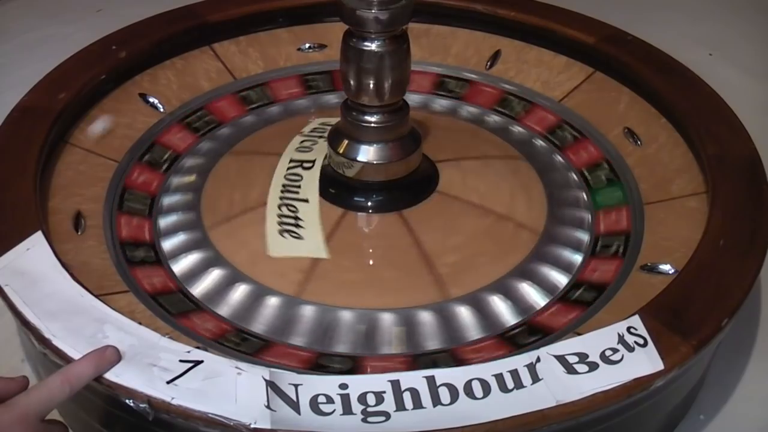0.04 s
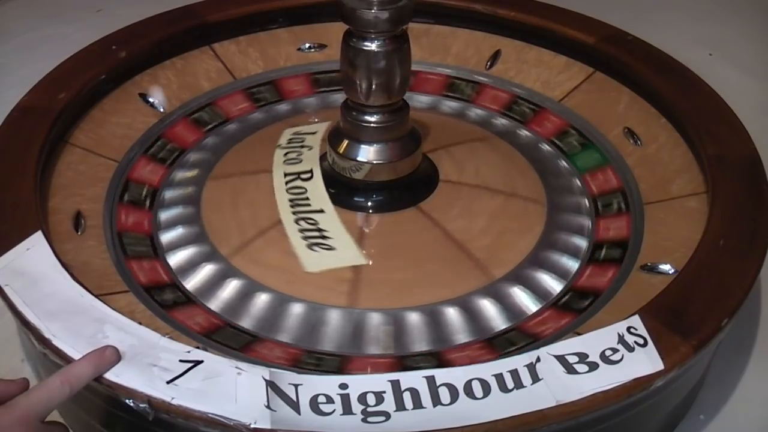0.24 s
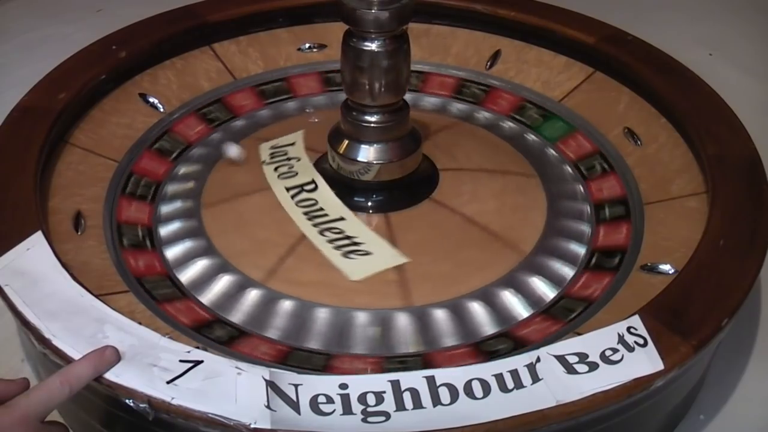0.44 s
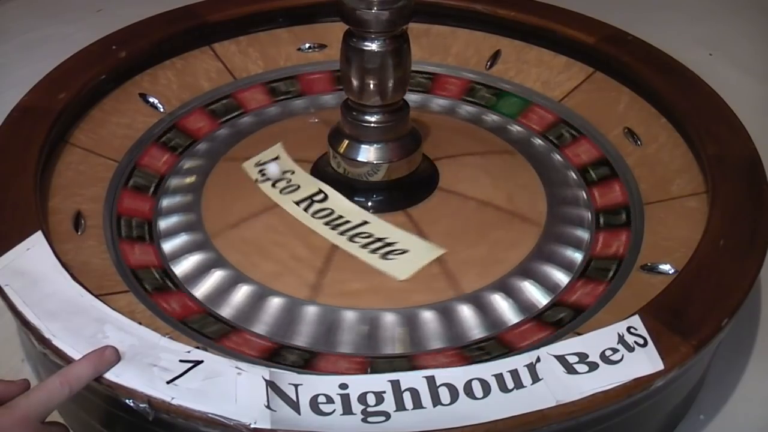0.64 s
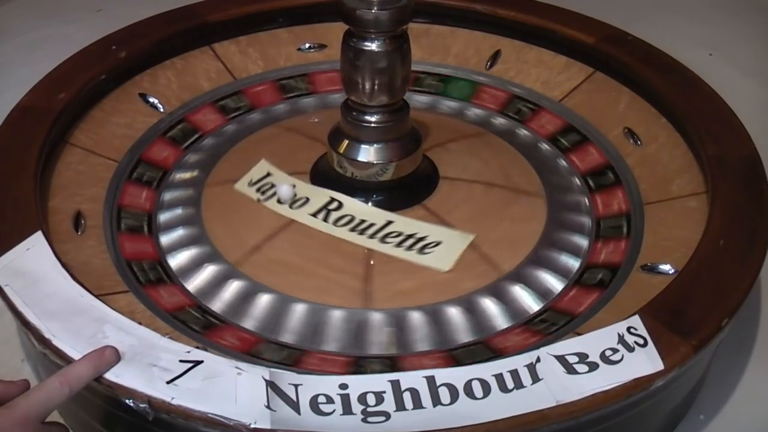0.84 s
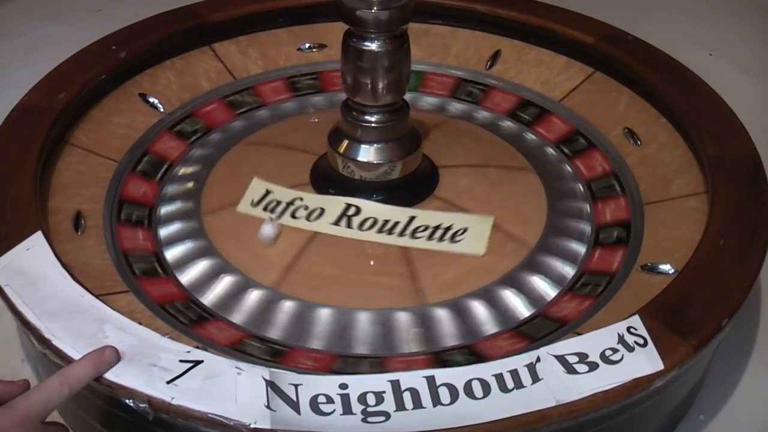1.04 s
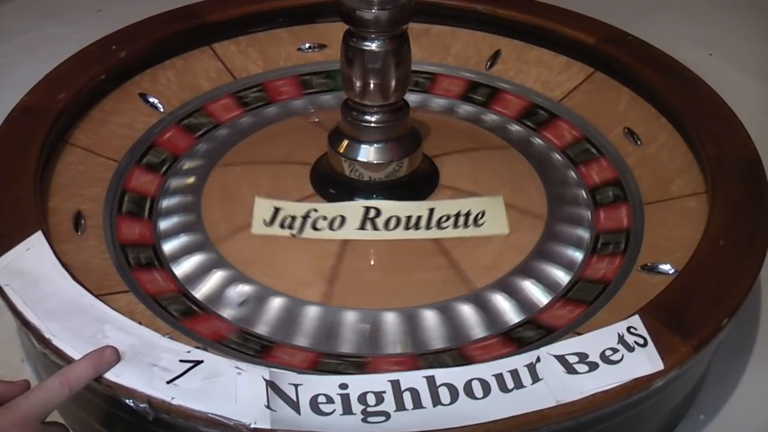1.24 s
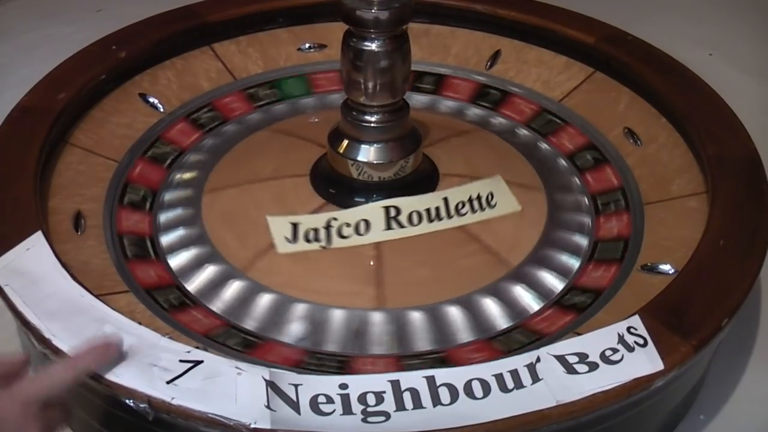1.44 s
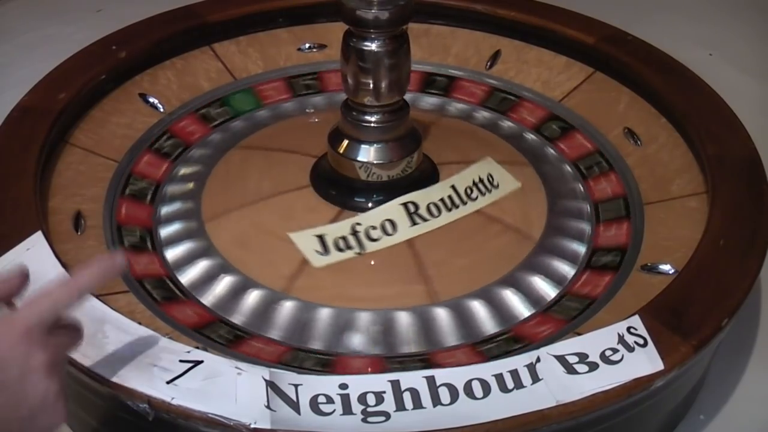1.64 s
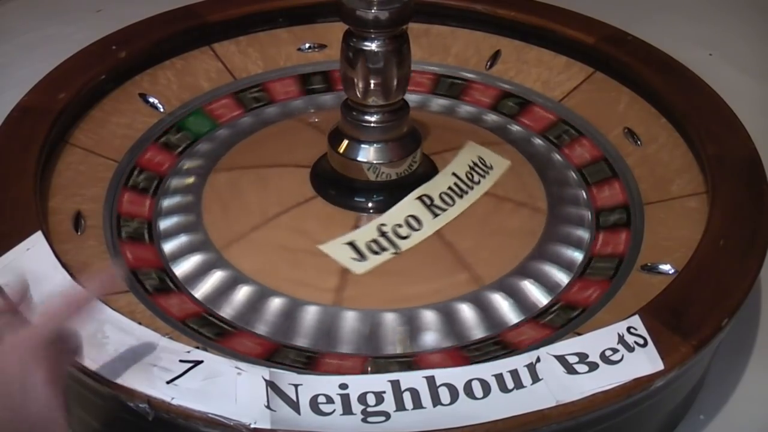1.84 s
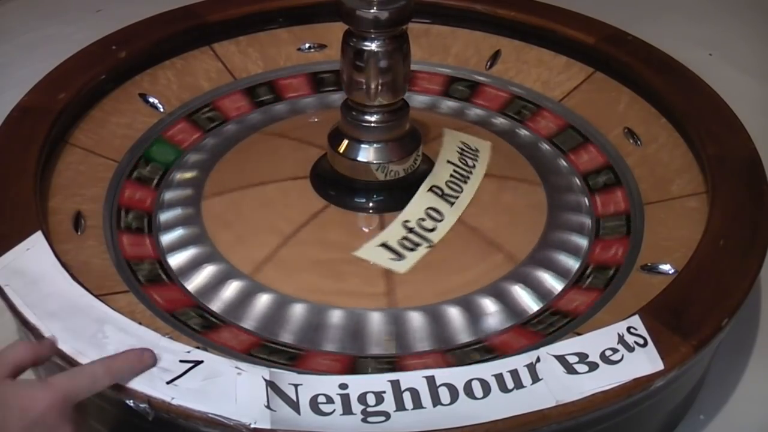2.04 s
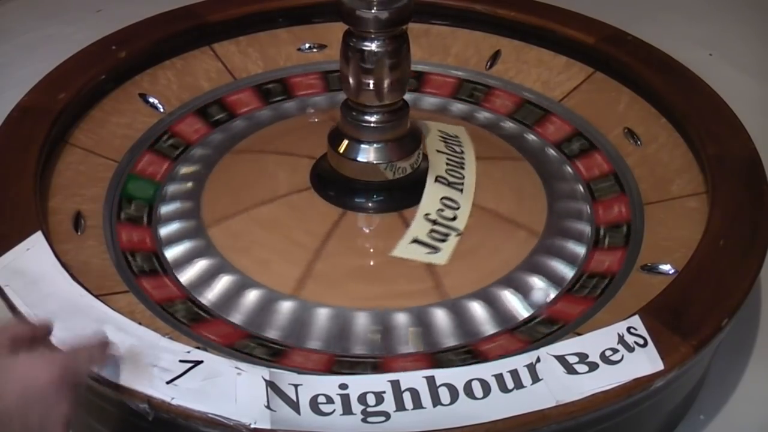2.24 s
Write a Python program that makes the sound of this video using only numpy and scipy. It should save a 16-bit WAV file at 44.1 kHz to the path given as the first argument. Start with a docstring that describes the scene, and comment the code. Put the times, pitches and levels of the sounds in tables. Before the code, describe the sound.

A roulette ball clacks, bounces and rattles to rest in a spinning wheel's pockets.

```python
"""Roulette ball coming to rest.

A small hard ball leaves the track of a spinning wheel, strikes a metal deflector and the rim of the
pocket ring, bounces ever faster on the wooden cone, rolls back down and rattles to rest in the pockets.
Each contact is a noise clack plus damped modes. A sharp click with a low thump follows.
The wheel's bearing rumbles faintly in a small room."""
import sys
import numpy as np
from scipy import signal
from scipy.fft import rfft, irfft, next_fast_len
from scipy.io import wavfile
from scipy.ndimage import uniform_filter1d

SR = 44100
rng = np.random.default_rng(int(sys.argv[2]) if len(sys.argv) > 2 else 0)


def int16_out(signal):
    """Quantize to a 16-bit WAV file."""
    q = np.round(np.clip(np.atleast_2d(signal).T, -1, 1) * 32767)
    wavfile.write(sys.argv[1], SR, q.astype(np.int16))


N = 101429

# Contacts: t/s, relative level/dB, contact cut-off f/Hz, ring offset/dB
DEFLECTOR_HITS = [(.2253, -7.5, 14000, 7.5)]
RIM_HITS = [(.4073, -12, 5800, 0.0087)]
CONE_HITS = [(.4815, -5, 8000, 8), (.5672, -7, 6500, 4), (.6338, -9, 4200, 1), (.6831, -9, 3300, 1),
             (.7199, -13.5, 3300, 0), (.7462, -19.5, 3290, -15.5), (.7671, -40, 3200, -3),
             (.783, -56.5, 3000, 8), (.796, -45, 3000, 10)]
POCKET_HITS = [(1.0783, -52.5, 4730, 13), (1.1321, -40, 3500, -4), (1.2194, -41.5, 3070, -10),
               (1.2439, -31, 3000, -6), (1.2585, -25.5, 3400, -0.5), (1.2992, -24, 3070, 0.5),
               (1.3155, -16.5, 5800, 6.5), (1.3558, -18, 4660, 3), (1.4145, -19.5, 4700, 1.5),
               (1.4545, -20.5, 6200, -3.5), (1.4884, -22.5, 3860, 5.5), (1.5135, -22.5, 4000, 0.5),
               (1.5312, -24.5, 9550, 5), (1.546, -22.5, 5300, -9.5), (1.5548, -26.5, 3500, 9),
               (1.5736, -23.5, 3500, -12), (1.5906, -27, 3270, 7), (1.6045, -33.5, 3000, -5),
               (1.616, -38, 2980, 0), (1.626, -28, 2950, -2.5), (1.6892, -26.5, 3530, 8),
               (1.706, -23, 2750, 1), (1.7182, -30.5, 2550, -8), (1.7292, -30, 2420, 9.5),
               (1.7665, -30, 2850, 6.5), (1.8135, -36.5, 2580, 2.5), (1.8445, -41.5, 2400, 10.5),
               (1.866, -49.5, 2150, 16.5)]
CLICK_HITS = [(2.0076, -17, 15700, 0)]
# Clack spectra: f/Hz, relative level/dB
DEFLECTOR_SPECTRUM = [(150, -24.5), (230, -22.5), (420, -13.5), (620, -15), (950, -6.5), (1600, -2.5),
                      (2300, -6.5), (3000, 0.5), (3400, -2.5), (4200, 4), (5000, -4), (5900, -10),
                      (6700, -29.5), (7300, -15.5), (8400, -14.5), (10000, -22.5), (13000, -20),
                      (16000, -43)]
RIM_SPECTRUM = [(150, -23.5), (330, -4.5), (520, -9.5), (750, -5), (1050, -3), (1300, -10.5), (1700, 4.5),
                (2050, -9.5), (2400, 2), (2800, 3), (3300, -20.5), (3800, 3), (4800, -11), (6000, -20.5),
                (9000, -22.5), (15000, -31.5)]
CONE_SPECTRUM = [(150, -31), (420, -17), (620, -10), (880, -2.5), (1210, -8), (1560, -1.5), (1890, -7.5),
                 (2410, 2), (2750, -7), (3200, -1.5), (3900, -14), (5200, -17.5), (6200, -19.5),
                 (8500, -24.5), (12000, -30.5), (16000, -52.5)]
POCKET_SPECTRUM = [(150, -33.5), (550, 0), (900, -30.5), (1150, -5), (1650, 1), (2000, -1.5), (2400, 7.5),
                   (3100, -1), (3800, 0), (4700, -8.5), (6000, -16.5), (9000, -15.5), (15000, -39)]
CLICK_SPECTRUM = [(150, -14.5), (900, -8.5), (2000, -16), (3100, -15), (3800, -11), (4350, -8.5),
                  (4950, 1.5), (5300, -7.5), (5650, -8.5), (6200, -8), (7000, -16.5), (8500, -12),
                  (10000, -20.5), (13000, -20), (16000, -34)]
# Modes of the struck parts: f/Hz, relative level/dB, t60/s
BOWL_MODES = [(226, -15, .2), (567, -8.5, 0.052), (879.3, -4, .15), (964, -5, 0.22), (1310, -7, 0.1),
              (1440, -21.5, 0.45), (1707, -7, 0.18), (1930, -16, .12), (2950, -20, .06)]
RIM_MODES = [(910, 3.5, 0.23), (1032, -1, .06), (1680, -9.5, 0.2), (2320, -2, 0.033), (2790, 5, 0.032),
             (3560, -18.5, 0.057), (3960, -15.5, 0.085), (4150, -24, .12), (5020, -18.5, 0.23)]
CONE_MODES = [(900, -32, 0.012), (1183, -12, 0.054), (1520, -2.5, .025), (2003, -8, 0.036),
              (2485, 0, 0.025), (2590, -1, .01), (3300, -12.5, 0.026)]
POCKET_MODES = [(898.2, 0, 0.23), (1644.5, 4, 0.067), (1718, 0, 0.074), (2570, -2.5, 0.064),
                (2402, -4.5, 0.066), (2870, -10.5, 0.033), (3500, -11, 0.17), (3705, -13.5, 0.048),
                (4630, -16, .1)]
CLICK_MODES = [(964, 3, 0.12), (1300, -2, 0.098), (3900, -2, 0.058), (4560, 0.5, 0.077), (5136, -6, 0.14)]
THUMP_MODES = [(109.8, -4, 0.4), (147, 2, 0.24), (215.3, 8, 0.19), (318, -1, 0.18)]
# Rolling and rumble envelopes: t/s, level/dB
TRACK_ROLL_LEVEL = [(0, -45), (.05, -45), (.1, -45.5), (.16, -43), (.22, -46.5), (.36, -68)]
WHEEL_ROLL_LEVEL = [(.76, -63.5), (.79, -43), (.85, -63.5), (.93, -88), (1.06, -62.5), (1.1, -50),
                    (1.16, -44), (1.21, -50), (1.3, -50), (1.62, -40), (1.68, -49), (1.8, -43.5),
                    (1.88, -54.5), (2.0, -71.5)]
RUMBLE_LEVEL = [(0, -54.5), (.9, -55), (1.2, -54), (1.5, -48.5), (1.9, -55), (2.3, -52)]
# Rolling and rumble spectra: f/Hz, relative level/dB
TRACK_ROLL_SPECTRUM = [(100, -74), (230, 3.5), (430, -4), (560, -2), (720, -1.5), (950, 7), (1400, -4.5),
                       (2000, -3), (3000, -18), (5000, -17), (12000, -35), (16000, -86)]
WHEEL_ROLL_SPECTRUM = [(150, -29), (300, -3), (500, 6), (1050, 8.5), (1280, 4.5), (1600, 12.5), (1950, -3),
                       (2450, -5.5), (3300, -30.5), (4400, -18.5), (7000, -25), (12000, -39), (16000, -81)]
RUMBLE_SPECTRUM = [(15, -22.5), (35, -13.5), (70, 1), (110, -0.5), (200, 0), (330, -2.5), (420, -7.5),
                   (600, -8), (800, -19.5), (950, -10.5), (1400, -23), (2200, -28), (4000, -29),
                   (8500, -35), (11500, -50), (16000, -93)]
# Room decay: f/Hz, t60/s
ROOM_DECAY = [(150, 0.69), (1000, 0.35), (2500, 0.26), (5000, 0.26), (9000, 0.27), (15000, 0.1)]

HIT_SAMPLES = SR // 2
AGE_S = np.arange(HIT_SAMPLES) / SR  # time since contact


def ball_in_bowl():
    """The ball rolls off the track and strikes a metal deflector; both ring the bowl."""
    roll = rolling(TRACK_ROLL_LEVEL, TRACK_ROLL_SPECTRUM, BOWL_MODES, ring_db=3, roughness_db=0.5)
    return roll + impacts(DEFLECTOR_HITS, DEFLECTOR_SPECTRUM, BOWL_MODES, gain_db=11.5, ring_db=-37,
                          snap_db=-12, rise_s=0.000067, clack_t60_s=0.013,
                          wall_db=-7.5, room_db=-2, ring_send_db=-6)


def ball_on_rim():
    """The first blow on the wheel rings its metal rim."""
    return impacts(RIM_HITS, RIM_SPECTRUM, RIM_MODES, gain_db=13, ring_db=-24,
                   snap_db=-31.5, rise_s=0.0011, clack_t60_s=0.012,
                   wall_db=-41, room_db=-3, ring_send_db=-14)


def ball_on_cone():
    """Ever faster, fading bounces on wood; short modes give a hollow knock."""
    return impacts(CONE_HITS, CONE_SPECTRUM, CONE_MODES, gain_db=10.5, ring_db=-26,
                   snap_db=-14, rise_s=0.0004, clack_t60_s=0.007,
                   wall_db=-26, room_db=-3, ring_send_db=-3)


def ball_in_pockets():
    """The ball rolls and rattles between ringing pocket walls."""
    roll = rolling(WHEEL_ROLL_LEVEL, WHEEL_ROLL_SPECTRUM, POCKET_MODES, ring_db=-9, roughness_db=2.5)
    return roll + impacts(POCKET_HITS, POCKET_SPECTRUM, POCKET_MODES, gain_db=14, ring_db=-29,
                          snap_db=-22, rise_s=0.003, clack_t60_s=0.011,
                          wall_db=-16, room_db=-4, ring_send_db=-12)


def click(thump_gain_db=-36, thump_rise_s=0.029):
    """A bright click with a low thump in the table."""
    out = impacts(CLICK_HITS, CLICK_SPECTRUM, CLICK_MODES, gain_db=18, ring_db=-36.5,
                  snap_db=-18, rise_s=0.0006, clack_t60_s=0.004,
                  wall_db=-7, room_db=-3.5, ring_send_db=-1.5)
    thump = amp(thump_gain_db) * ring(THUMP_MODES) * (1 - np.exp(-AGE_S / thump_rise_s))
    add(out, CLICK_HITS[0][0], thump)
    return out


def impacts(hits, spectrum, modes, gain_db, ring_db, snap_db, rise_s, clack_t60_s,
            wall_db, room_db, ring_send_db, wall_delay_s=0.0101):
    """Per contact: clack, modes, wall echo and room tail, low-passed by contact softness."""
    out = np.zeros((2, N))
    for start_s, hit_db, contact_hz, ring_offset_db in hits:
        excitation = burst(snap_db, rise_s, clack_t60_s)
        clack = filtered(excitation, lambda hz: minimum_phase(amp(log_interp(spectrum, hz))))
        clack /= np.linalg.norm(clack[0])
        tone = amp(ring_db + ring_offset_db) * ring(modes)
        send = clack + amp(ring_send_db) * tone
        reverb = amp(room_db) * signal.fftconvolve(send, room_tail(), axes=1)[:, :HIT_SAMPLES]
        echo = amp(wall_db) * np.pad(clack, ((0, 0), (round(wall_delay_s * SR), 0)))[:, :HIT_SAMPLES]
        softness = lambda hz: minimum_phase(1 / np.sqrt(1 + (hz / contact_hz) ** 4))
        add(out, start_s, amp(hit_db + gain_db) * filtered(clack + tone + echo + reverb, softness))
    return out


def burst(snap_db, rise_s, t60_s, smoothing_hz=260):
    """A snap and its dense reflections inside the part, spectrally flattened."""
    x = noise(HIT_SAMPLES, width=0.11) * amp(-60 * AGE_S / t60_s) * (1 - np.exp(-AGE_S / rise_s))
    x /= np.linalg.norm(x[0])
    x[:, 0] += amp(snap_db)
    power = np.abs(rfft(x.mean(0))) ** 2
    smooth_power = uniform_filter1d(power, size=int(smoothing_hz * HIT_SAMPLES / SR))
    whitening = minimum_phase((np.abs(smooth_power) + 1e-9) ** -0.5)
    return irfft(rfft(x) * whitening, HIT_SAMPLES)


def ring(modes):
    """Damped sines of alternating sign; 1 dB random spread per strike."""
    return sum((-1) ** k * amp(db + rng.normal() - 60 * AGE_S / t60_s) * np.sin(2 * np.pi * hz * AGE_S)
               for k, (hz, db, t60_s) in enumerate(modes))


def rolling(levels, spectrum, modes, ring_db, roughness_db, stop_s=0.015, ring_cutoff_hz=5000):
    """Tiny bumps under the ball excite the part it runs on until contact ends."""
    bumps = noise(N, width=0.44)
    bumps *= amp(roughness_db * unit_rms(uniform_filter1d(rng.standard_normal(N), size=200)))
    surface = unit_rms(filtered(bumps, lambda hz: amp(log_interp(spectrum, hz))))
    body = unit_rms(filtered(bumps, lambda hz: resonance(modes, hz) / (1 + (hz / ring_cutoff_hz) ** 4)))
    end_s = levels[-1][0]
    contact = np.clip((end_s - np.arange(N) / SR) / stop_s, 0, 1)
    return contact * envelope(levels) * unit_rms(surface + amp(ring_db) * body)


def resonance(modes, hz):
    """Response of a driven part: one band-pass per mode."""
    response = 0
    for mode_hz, db, t60_s in modes:
        bandwidth_hz = 2.2 / t60_s
        damping = 1j * hz * bandwidth_hz
        response += amp(db) * damping / (mode_hz ** 2 - hz ** 2 + damping)
    return response


def room_tail(onset_s=0.0056):
    """Diffuse reflections: fresh unit-energy noise, bass decaying slowest."""
    hz, t_s, bins = signal.stft(noise(HIT_SAMPLES, width=0.38), SR, nperseg=256)
    decay = amp(-60 * t_s / log_interp(ROOM_DECAY, hz)[:, None])
    tail = signal.istft(bins * decay, SR, nperseg=256)[1][:, :HIT_SAMPLES]
    tail *= 1 - np.exp(-(AGE_S / onset_s) ** 2)
    return tail / np.linalg.norm(tail[0])


def bearing():
    """Low rumble of the turning wheel over a faint hiss."""
    rumble = filtered(noise(N, width=0.32), lambda hz: amp(log_interp(RUMBLE_SPECTRUM, hz)))
    return envelope(RUMBLE_LEVEL) * unit_rms(rumble)


def amp(db):
    return 10 ** (np.asarray(db) / 20)


def unit_rms(x):
    return x / np.sqrt(np.mean(x ** 2) + 1e-20)


def log_interp(points, hz):
    """Interpolate (f/Hz, value) points over log frequency."""
    points_hz, values = np.transpose(points)
    return np.interp(np.log(hz + 1), np.log(points_hz + 1), values)


def envelope(levels):
    """Gain per sample from (t/s, level/dB) points."""
    return amp(np.interp(np.arange(N) / SR, *np.transpose(levels)))


def filtered(x, response):
    """Zero-padded FFT filter by response(hz)."""
    size = next_fast_len(x.shape[-1] + 8192)
    hz = np.fft.rfftfreq(size, 1 / SR)
    return irfft(rfft(x, size) * response(hz), size)[..., :x.shape[-1]]


def minimum_phase(gain):
    """Causal response with the given magnitude."""
    cepstrum = irfft(np.log(np.maximum(gain, 1e-6)))
    half = len(cepstrum) // 2
    cepstrum[1:half] *= 2
    cepstrum[half + 1:] = 0
    return np.exp(rfft(cepstrum))


def noise(size, width):
    """Stereo white noise; width = side / mid."""
    mid, side = rng.standard_normal((2, size))
    return unit_rms(np.array([mid + width * side, mid - width * side]))


def add(out, start_s, x):
    start = round(start_s * SR)
    out[:, start:start + x.shape[-1]] += x[..., :N - start]


def scene():
    """Ball and click slightly to the right, over the bearing rumble."""
    ball = ball_in_bowl() + ball_on_rim() + ball_on_cone() + ball_in_pockets()
    pan_db = 0.46
    return (ball + click()) * amp([[-pan_db], [pan_db]]) + bearing()


def record(dry):
    """Microphone bass roll-off and hard band limit."""
    low_cut_hz, top_hz = 27, 16600
    return filtered(dry, lambda hz: (hz < top_hz) * (1j * hz / (low_cut_hz + 1j * hz)) ** 2)


dry = scene()
out = record(dry)
int16_out(out)
```